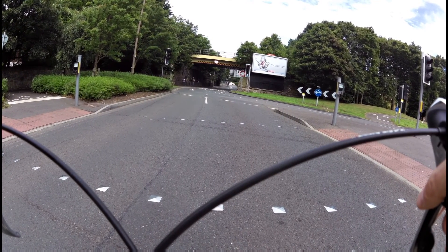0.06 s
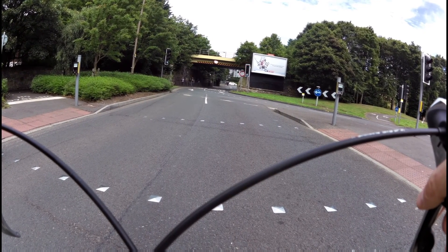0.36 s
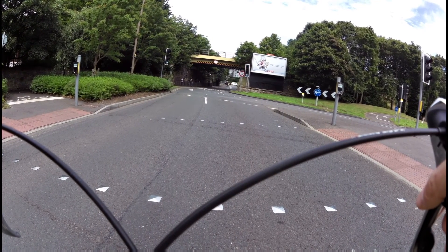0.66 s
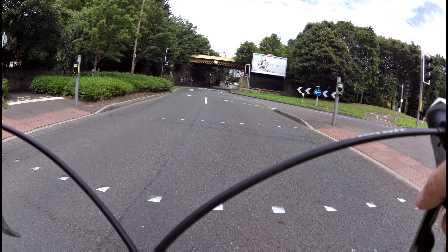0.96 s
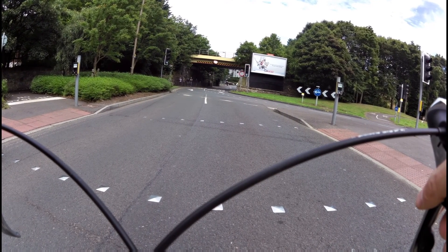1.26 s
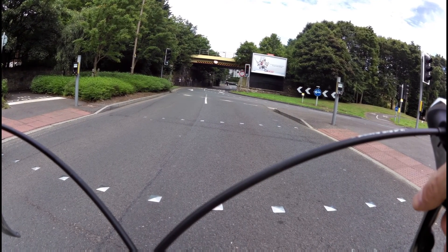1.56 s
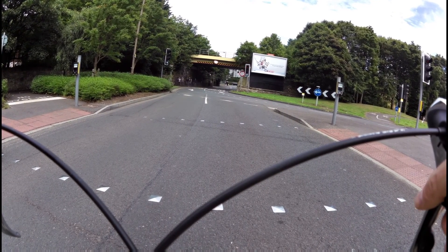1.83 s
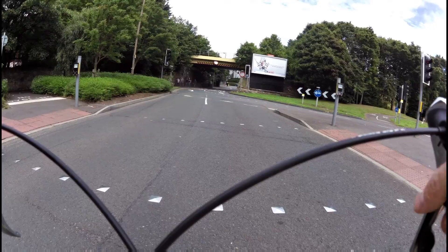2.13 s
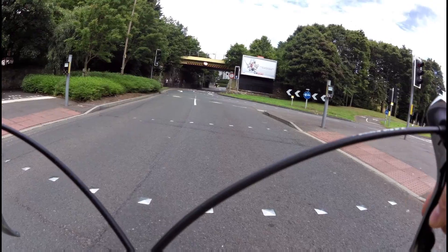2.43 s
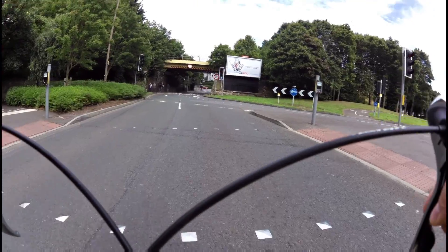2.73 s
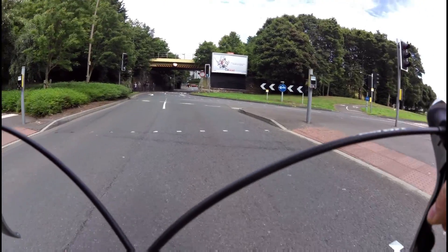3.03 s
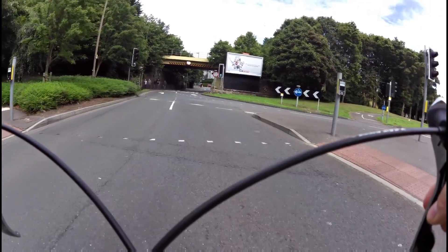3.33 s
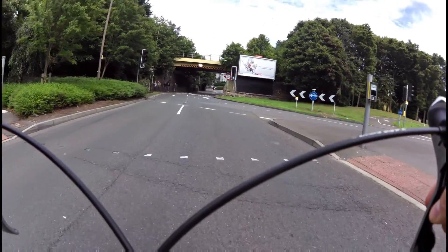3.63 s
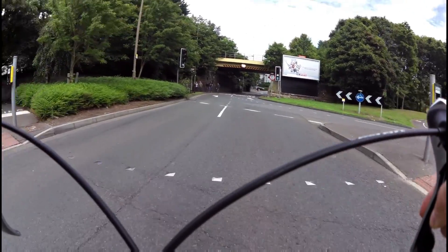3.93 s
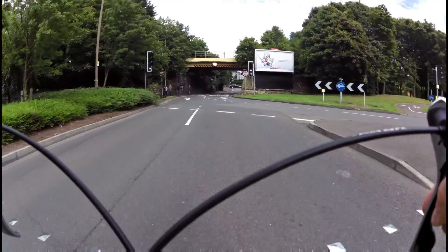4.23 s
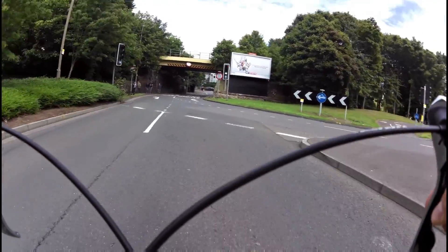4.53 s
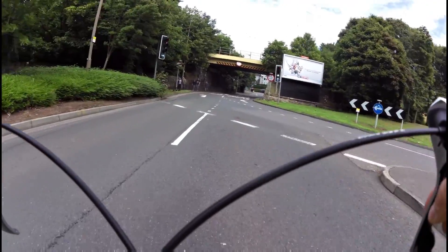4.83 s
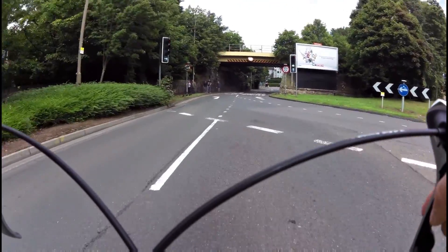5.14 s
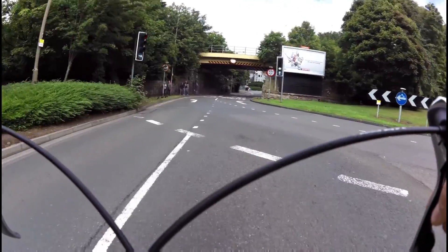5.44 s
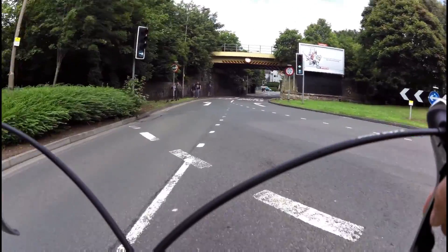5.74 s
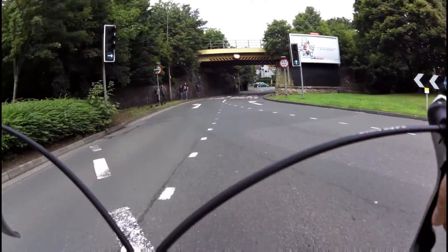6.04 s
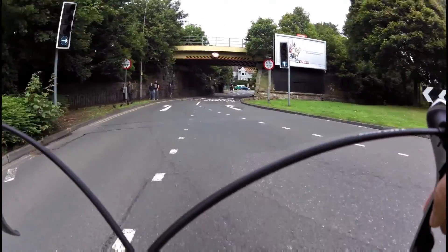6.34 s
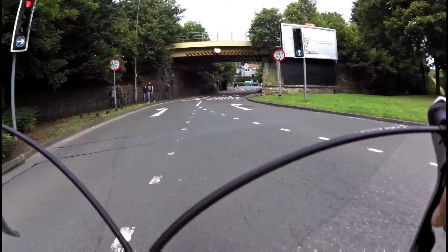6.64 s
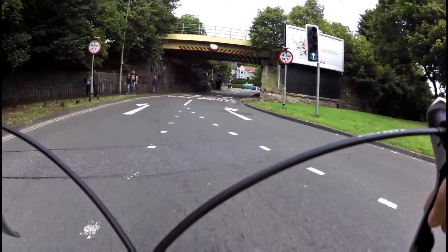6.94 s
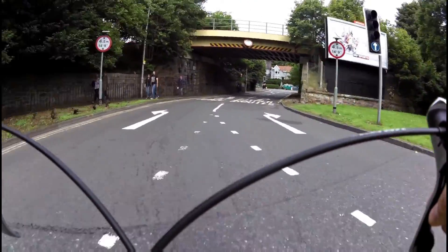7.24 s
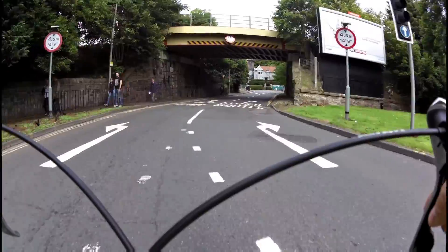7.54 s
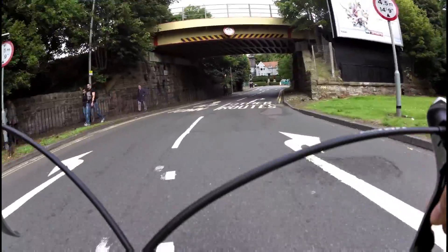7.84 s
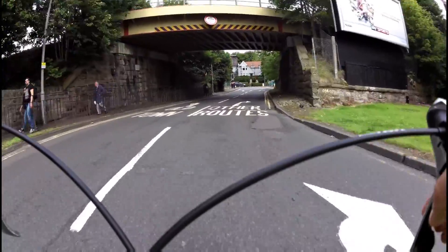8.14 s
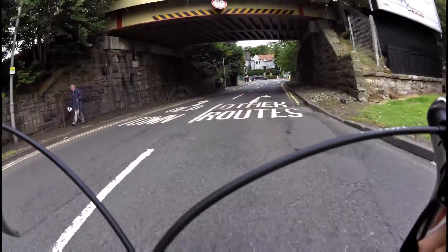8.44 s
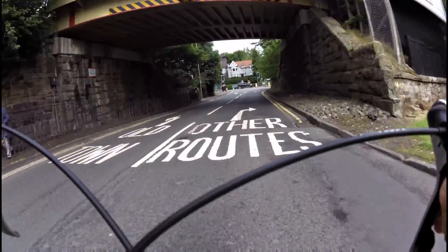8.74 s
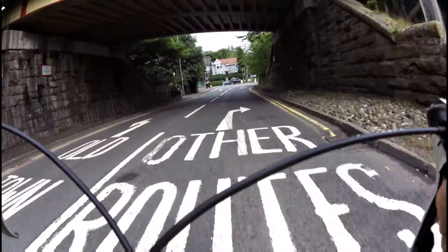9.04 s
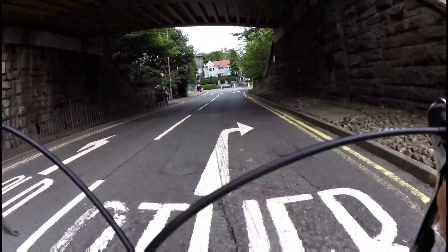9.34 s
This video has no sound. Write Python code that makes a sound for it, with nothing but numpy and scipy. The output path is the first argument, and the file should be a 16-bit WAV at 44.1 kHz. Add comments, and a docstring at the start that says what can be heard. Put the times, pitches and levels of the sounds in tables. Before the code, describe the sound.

A bicycle sets off with a sharp pedal click and hard knocks, then rolls with a rattling drone, ticks and buffeting wind.

```python
"""A bicycle sets off

A bicycle waits in distant traffic. A shoe snaps into its pedal, and knocks ring the frame as it gets going.
Rough asphalt shakes the handlebar and the camera case on it, chain and cables tick, and near a bridge
wind slaps the case. The case muffles the treble, and the hardest blows overload the microphone."""
import sys
import numpy as np
from scipy import signal
from scipy.fft import rfft, irfft, next_fast_len
from scipy.io import wavfile

SR = 44100
rng = np.random.default_rng(int(sys.argv[2]) if len(sys.argv) > 2 else 0)


def store_pcm(level_fs):
    """Save levels as 16-bit WAV."""
    pcm = np.round(np.clip(level_fs, -1, 1) * 32767).astype(np.int16)
    wavfile.write(sys.argv[1], SR, np.atleast_2d(pcm).T)


N = 418509

# tone colour of the far traffic: f/Hz, relative level/dB
TRAFFIC_SPECTRUM = [(15, -64.5), (25, -36.5), (43, -12), (87, -6.5), (228, -5), (291, -2.5), (333, -7),
                    (389, -9.5), (416, -9.5), (509, -14), (666, -14), (1590, -21.5), (2660, -37),
                    (3800, -38.5), (5190, -53), (6750, -74), (11400, -120)]
# a far engine's hum swells and fades: t/s, half-length/s, level/dB
ENGINE_SWELLS = [(1.5, .3, -50.5)]
# knocks on the frame: t/s, strength/dB, contact cut-off f/Hz (lower is softer)
KNOCKS = [(0.501, -29, 300), (2.208, -23, 700), (2.2475, -18.5, 800), (2.2585, -16, 500), (2.308, -21, 600),
          (2.334, -20.5, 3000), (2.6378, -9, 3000), (2.7815, -6.5, 700), (2.791, -10, 920),
          (3.276, -11, 600), (3.3135, 2, 597), (3.3195, 8, 900), (3.3235, 3.5, 1100), (3.3275, 6, 900),
          (3.4935, 8, 1400), (3.499, 3.5, 3000), (3.508, 4.5, 990), (4.297, -9, 1200), (4.330, -2, 1700),
          (4.337, -7, 2530), (4.717, -8.5, 2500), (5.484, -11, 1000), (6.680, -4.5, 710), (6.898, -9, 2000),
          (7.024, -6.5, 1400), (7.311, -9, 2000), (8.433, -2, 4000), (8.577, -3.5, 1500), (8.652, -7, 1200)]
# modes (natural tones) of frame and case: f/Hz, relative level/dB, ring time/s
FRAME_MODES = [(142, -23.5, 0.034), (260, -15.5, .045), (361, -6.5, 0.037), (517, 0.5, 0.025),
               (691, -4, 0.018), (950, -8, 0.0089), (1590, -11.5, .014), (2090, -23, 0.033),
               (2730, -20.5, 0.017), (3720, -22.5, 0.011)]
# metal parts singing: f/Hz, width/Hz, level/dB
METAL_BANDS = [(2540, 260, -68.5), (3130, 220, -70.5), (3705, 240, -69)]
# the shoe slides onto the pedal: t/s, relative level/dB
SCUFF_CURVE = [(2.2, -93), (2.245, -35), (2.26, -23.5), (2.28, -34.5), (2.31, -34), (2.36, -46),
               (2.45, -90)]
CLEAT_CONTACTS = [(2.6339, -4.5), (2.636, -4.5), (2.6384, -4.5)]
# tones of the cleat and of the pedal spring: f/Hz, relative level/dB, ring time/s
CLEAT_MODES = [(397, -26, 0.12), (1120, -16, 0.018), (1440, -8.5, 0.025), (2030, -19, 0.02),
               (2580, -27, 0.021), (3780, 0, 0.0088), (4320, -17, 0.0066), (7300, -45, .02)]
SPRING_MODES = [(3063, -42.5, 0.22), (5335, -55, .1)]
# the bicycle speeds up: t/s, share of cruising speed
SPEED = [(2.25, 0.0056), (2.68, .065), (2.85, .26), (3.2, 0.73), (3.8, 0.78), (4.3, .94), (7.0, 1.0),
         (9.49, 1.044)]
# loudness of the road rattle, dipping briefly near the end: t/s, relative level/dB
RATTLE_LEVEL = [(3.8, -3.5), (4.4, 0.5), (5.95, -2), (6.4, 0), (8.5, 1), (8.8, -2), (9.2, -10.5),
                (9.49, -1.5)]
# the handlebar shudders at the first hard push and a road patch: t/s, half-length/s, relative level/dB
SHUDDERS = [(3.17, 0.053, -20), (6.78, 0.073, -22)]
# where the shaken mount and case drone: f/Hz, width/Hz, relative level/dB
CASE_BANDS = [(132, 146, -13), (269.7, 94, -10.5), (401, 125, -12), (471.3, 74, -10.5), (682, 140, -24.5),
              (828, 255, -27), (1452, 230, -29.5)]
# tones that a tick rings in the case: f/Hz, relative level/dB, ring time/s
TICK_MODES = [(1940, -10, 0.0049), (2390, -1, 0.0059), (3090, -2.5, 0.0056), (3690, -6, .011),
              (4206, -8.5, 0.0065), (4730, -9.5, 0.005), (5560, -19.5, 0.0024), (6560, -23, 0.004)]
# the chain crackles as the first push pulls it tight: t/s, half-length/s, relative level/dB
CHAIN_STRAIN = [(3.14, .06, -44)]
# sharp ticks of gears and cables: t/s, strength/dB, centre f/Hz
TICKS = [(2.7911, -11.5, 3600), (2.9876, -28.5, 3300), (3.1984, -26, 2700), (3.475, -24, 2400),
         (3.5008, -8, 2300), (3.5167, -13, 2920), (4.133, -21.5, 2894), (4.3306, -20, 2800),
         (4.553, -24, 2600), (5.0782, -11, 3930), (5.1706, -19, 3500), (5.5087, -21.5, 2590),
         (5.8726, -9, 4100), (5.8818, -16, 3590), (6.0285, -24.5, 2900), (6.0876, -26.5, 3520),
         (6.1511, -13, 3900), (6.2062, -19, 3060), (6.3076, -17, 3730), (6.342, -19, 3760),
         (6.545, -9.5, 4230), (6.6925, -13, 4320), (7.2435, -22.5, 3505), (7.309, -24, 2700),
         (7.9978, -18.5, 3550), (8.429, -11, 3394), (8.4791, -13.5, 3590), (8.9244, -11, 2620)]
# a squeak of rubbing metal: t/s, half-length/s, level/dB
SQUEAK_SWELLS = [(6.63, 0.045, -70)]
# tone colour of wind on the case: f/Hz, relative level/dB
WIND_SPECTRUM = [(15, -30.5), (35, -2), (52, 10), (100, 5.5), (250, 9), (600, -14), (2000, -78),
                 (8000, -100)]
# gusts: t/s, half-length/s, level/dB
GUSTS = [(6.92, 0.033, -35), (8.63, 0.18, -36.5), (8.96, 0.15, -28), (9.49, 0.072, -34.5)]
# the hardest wind slaps: t/s, strength/dB
BIG_SLAPS = [(6.906, -0.5), (8.484, -3), (8.582, 4.5), (8.589, -0.5), (8.664, -0.5), (8.686, 2),
             (8.796, 2.5), (8.886, 3.5), (8.922, 3), (8.931, 5.5), (8.972, 1.5), (9.005, 1), (9.051, 3),
             (9.085, -2.5), (9.109, -0.5), (9.148, -4)]
# the air's short swing after a slap: f/Hz, relative level/dB, ring time/s
SLAP_MODES = [(131, -3.5, 0.006), (325, 12, 0.0079), (860, -8, 0.007), (1350, -16.5, 0.0031),
              (2800, -29, .003)]
# tone colour of the microphone's hiss: f/Hz, relative level/dB
HISS_SPECTRUM = [(1000, 0.5), (5500, -2.5), (8000, -10), (11000, -16.5), (16000, -24)]


def from_db(db):
    """Turn decibels into a factor to multiply by."""
    return 10 ** (np.asarray(db) / 20)


def rms_one(x):
    """Scale a signal so that its average strength (rms) is 1."""
    return x / np.sqrt(np.mean(x ** 2) + 1e-20)


def curve(rows):
    """Join (time, value) points with straight lines."""
    return np.interp(np.arange(N) / SR, *np.transpose(rows))


def swells(rows):
    """A volume that rises and falls in bell shapes."""
    t = np.arange(N) / SR
    return sum(from_db(db) * np.exp(-((t - s) / half_s) ** 2) for s, half_s, db in rows)


def low_pass(x, hz, order):
    """Keep what lies below hz; a higher order cuts more steeply."""
    return signal.sosfilt(signal.butter(order, min(hz, .45 * SR), fs=SR, output="sos"), x + 1e-18)


def high_pass(x, hz, order):
    """Keep what lies above hz."""
    return signal.sosfilt(signal.butter(order, hz, "high", fs=SR, output="sos"), x + 1e-18)


def drift(rate_hz):
    """A slow random wobble, about 1 in size."""
    return rms_one(low_pass(rng.standard_normal(N + SR), rate_hz, order=2)[SR:])


def coloured_noise(spectrum):
    """Noise with the given tone colour."""
    hz, db = np.transpose(spectrum)
    size = next_fast_len(N)
    bins_hz = np.maximum(np.arange(size // 2 + 1) * SR / size, 1)
    gain = from_db(np.interp(np.log(bins_hz), np.log(hz), db))
    return rms_one(irfft(rfft(rng.standard_normal(size)) * gain, size)[:N])


def shaken(hz, width_hz):
    """A part shaken at random hums in a band around its own pitch."""
    decay = np.exp(-np.pi * width_hz / SR)
    resonator = [1, 0, -1, 1, -2 * decay * np.cos(2 * np.pi * hz / SR), decay * decay]
    return rms_one(signal.sosfilt([resonator, resonator], rng.standard_normal(N)))


def clicks_at(times, sizes):
    """One click at each time."""
    clicks = np.zeros(N)
    samples = np.round(np.asarray(times) * SR).astype(int)
    np.add.at(clicks, np.clip(samples, 0, N - 1), sizes)
    return clicks


def tails(clicks, fade_s):
    """Give each click a smoothly fading tail."""
    return signal.lfilter([1], [1, -np.exp(-1 / (fade_s * SR))], clicks + 1e-18)


def ring(clicks, hz, ring_s):
    """Each click starts a tone that fades by 60 dB in ring_s."""
    decay = np.exp(-np.log(1000) / (ring_s * SR))
    step = 2 * np.pi * hz / SR
    return signal.lfilter([0, np.sin(step)], [1, -2 * decay * np.cos(step), decay * decay], clicks + 1e-18)


def strike(times, db, modes, vary_db, colour_db=0):
    """Blows ring an object's tones; colour_db shifts each tone's level, and vary_db adds chance."""
    shift_db = colour_db + vary_db * rng.standard_normal((len(times), len(modes)))
    sound = np.zeros(N)
    for k, (hz, mode_db, ring_s) in enumerate(modes):
        sizes = from_db(db + mode_db + shift_db[:, k])
        sound += (-1) ** k * ring(clicks_at(times, sizes), hz, ring_s)
    return sound


def softened(modes, contact_hz):
    """Each tone's change in dB under a soft blow, which barely rings the high ones."""
    return -10 * np.log10(1 + (np.array(modes)[:, 0] / np.reshape(contact_hz, (-1, 1))) ** 2)


def along_the_road(speed, per_s, jitter=.45):
    """Uneven moments that come more often the faster the wheels roll."""
    travelled = np.cumsum(speed) / SR
    marks = (np.arange(200) + 1 + jitter * rng.uniform(-1, 1, size=200)) / per_s
    return np.interp(marks[marks < travelled[-1]], travelled, np.arange(N) / SR)


def traffic(level_db=-44):
    """Far cars blend into a wash, with one engine humming in it."""
    wash = from_db(level_db + 0.73 * drift(15.0)) * coloured_noise(TRAFFIC_SPECTRUM)
    return wash + swells(ENGINE_SWELLS) * shaken(hz=101.3, width_hz=7)


def knocks(speed, bump_db=-10.5, bump_contact_hz=650, clatter_db=-13):
    """Pedalling and bumps jolt the frame; loose parts fall back with two weaker, sharper taps."""
    road_bumps = [(s, bump_db, bump_contact_hz) for s in along_the_road(speed, per_s=2.5)]
    times, db, contact_hz = np.transpose(list(KNOCKS) + road_bumps)
    blows = strike(times, db, FRAME_MODES, vary_db=2.56, colour_db=softened(FRAME_MODES, contact_hz))
    sharper_db = softened(FRAME_MODES, 2 * contact_hz)
    for delay_s in rng.uniform(.002, .012, size=(len(times), 2)).T:
        blows += strike(times + delay_s, db + clatter_db, FRAME_MODES, vary_db=3.0, colour_db=sharper_db)
    return low_pass(blows, 6400, order=4)


def metal_ring(start_s=2.06, fade_in_s=.12):
    """Metal parts sing faintly from the moment the bicycle stirs."""
    moving = np.clip((np.arange(N) / SR - start_s) / fade_in_s, 0, 1)
    return moving * sum(from_db(db) * shaken(hz, width) for hz, width, db in METAL_BANDS)


def cleat():
    """The sole scuffs over the pedal, the steel cleat snaps in, and the spring rings on."""
    times, db = np.transpose(CLEAT_CONTACTS)
    snap = strike(times, db, CLEAT_MODES, vary_db=0)
    spring = strike(times[-1:], 0, SPRING_MODES, vary_db=0)
    sole = shaken(hz=460, width_hz=78) + shaken(hz=220, width_hz=270)
    scrape = low_pass(shaken(hz=3000, width_hz=1800), 4200, order=8)
    scuff = low_pass(sole, 1500, order=2) + from_db(-28.5) * scrape
    return low_pass(snap, 6500, order=3) + spring + from_db(curve(SCUFF_CURVE) - 1.5) * scuff


def pedalling(first_push_s=3.144, push_every_s=.605, effort_db=14, ease_s=1.72, swing_db=1):
    """Force on the pedals in dB: it swings with each push and eases once under way."""
    since_s = np.arange(N) / SR - first_push_s
    setting_off = effort_db * np.exp(-np.maximum(since_s, 0) / ease_s)
    return setting_off + swing_db * np.cos(2 * np.pi * since_s / push_every_s)


def road_shake(bar_db, drone_db, bumps):
    """The road makes the handlebar flex with a low hum, while mount and case drone above it."""
    bar = (from_db(bar_db) + swells(SHUDDERS)) * shaken(hz=90.1, width_hz=30)
    case = rms_one(sum(from_db(db) * shaken(hz, width) for hz, width, db in CASE_BANDS))
    return bar + from_db(drone_db + 2.0 * bumps) * low_pass(case, 1900, order=6)


def tyre_grit(level_db, bumps, grains_per_s=900, spread_db=8.5):
    """Grit under the tyres makes tiny ticks in a faint rub, stronger on each bump."""
    times = np.flatnonzero(rng.random(N) < grains_per_s / SR) / SR
    sizes_db = spread_db * np.minimum(rng.exponential(1, len(times)), 3.5)
    grains = strike(times, sizes_db, TICK_MODES, vary_db=4.5, colour_db=softened(TICK_MODES, 1490))
    rub = from_db(-4) * shaken(hz=2610, width_hz=590)
    return from_db(level_db + 3.3 * bumps) * low_pass(rms_one(grains) + rub, 4600, order=8)


def chain(speed, bumps, links_per_s=85, spread_db=6.0, cruise_db=-58):
    """Link after link meets the cog, some barely touching and some with a clear tick."""
    links = np.arange(round(links_per_s * N / SR))
    late, size = np.clip(rng.standard_normal((len(links), 2)), -2, 2).T
    times = (links + 0.27 * late) / links_per_s
    clinks = strike(times, spread_db * size, TICK_MODES, vary_db=6.0)
    gain = from_db(cruise_db) * speed ** 2 + swells(CHAIN_STRAIN)
    return gain * from_db(2.0 * bumps) * rms_one(low_pass(clinks, 6200, order=5))


def cable_taps(speed, tap_db=-26, spread_db=3, centre_hz=2750, spread_octaves=0.26):
    """Cables tap the frame, more often at speed and louder with the rattle; gives rows like TICKS."""
    times = along_the_road(speed ** 3, per_s=5.5, jitter=.9)
    size, pitch = np.clip(rng.standard_normal((len(times), 2)), -2, 2).T
    db = tap_db + spread_db * size + np.interp(times, *np.transpose(RATTLE_LEVEL))
    return np.column_stack([times, db, centre_hz * 2 ** (spread_octaves * pitch)])


def ticks(speed, focus_db=10, bounce_db=-6, spray_db=-26):
    """Gears and cables ring the case and bounce once; hard hits add a thin crack and a spray of noise."""
    times, db, centre_hz = np.vstack([TICKS, cable_taps(speed)]).T
    octaves_off = np.log2(np.array(TICK_MODES)[:, 0] / centre_hz[:, None]) - .25
    colour_db = -focus_db * octaves_off ** 2   # tones near the tick's centre ring most
    bounce_times = times + rng.uniform(.0008, 0.0027, len(times))
    rings = strike(times, db - 1, TICK_MODES, vary_db=2.5, colour_db=colour_db)
    rings += strike(bounce_times, db + bounce_db, TICK_MODES, vary_db=2.5, colour_db=colour_db)
    cracks = clicks_at(times, from_db(1.7 * db - 11))
    spray = from_db(spray_db) * tails(cracks, fade_s=.004) * rng.standard_normal(N)
    treble = high_pass(cracks + spray, 4000, order=2)
    return low_pass(rings, 6700, order=6) + low_pass(treble, 7000, order=1)


def squeak(hz=5330):
    """Rubbing metal gives a faint, slightly unsteady tone."""
    phase = 2 * np.pi * np.cumsum(hz + 12 * drift(40)) / SR
    return swells(SQUEAK_SWELLS) * np.sqrt(2) * np.sin(phase)


def flurry(start_s=8.87, end_s=9.06, per_s=72, strongest_db=-2):
    """Quick slaps of air at the height of the strongest gust; gives rows like BIG_SLAPS."""
    times = np.arange(start_s, end_s, 1 / per_s)
    late, weaker = rng.random((len(times), 2)).T
    return np.column_stack([times + late / per_s, strongest_db - 4 * weaker])


def wind(headwind_db, flutter_per_s=190):
    """Air rumbles over the case; slaps push or pull on the microphone, each with a swirling crunch."""
    flow = np.hypot(from_db(headwind_db), swells(GUSTS))
    rumble = flow * from_db(2.2 * drift(6.3)) * coloured_noise(WIND_SPECTRUM)
    times, db = np.vstack([BIG_SLAPS, flurry()]).T
    slaps = clicks_at(times, rng.choice([-1, 1], len(times)) * from_db(db - 6.5))
    # small slaps flutter between the big ones and grow with the flow
    slaps += (rng.random(N) < flutter_per_s / SR) * rng.uniform(-0.98, 1, N) * flow * from_db(17.0)
    swing = sum(from_db(mode_db) * ring(slaps, hz, ring_s) for hz, mode_db, ring_s in SLAP_MODES)
    swirls = tails(np.abs(slaps), fade_s=0.002)
    crunch = from_db(-13) * swirls * rms_one(low_pass(rng.standard_normal(N), 870, order=1))
    return rumble + high_pass(low_pass(swing + crunch, 3400, order=4), 110, order=2)


def scene(bar_db=-30.5, drone_db=-19.5, grit_db=-52.5, wind_db=-44):
    """Traffic all along; shaking, rattle and wind grow with speed, and pedalling strains the handlebar."""
    speed = curve(SPEED)
    tenfolds = np.log10(speed)   # 0 at cruising speed, -1 at a tenth of it
    rattle_db = curve(RATTLE_LEVEL)
    bumps = drift(18.2)   # the uneven road, shared by case, grit and chain
    shaking = speed * road_shake(bar_db + pedalling(), drone_db + 0.29 * rattle_db, bumps)
    rattling = from_db(rattle_db) * (tyre_grit(grit_db + 21.5 * tenfolds, bumps) + chain(speed, bumps))
    bicycle = shaking + rattling + metal_ring() + knocks(speed) + cleat() + ticks(speed) + squeak()
    return (traffic() + bicycle + wind(wind_db + 16 * tenfolds))[None]


def record(dry, hiss_db=-77, overload=0.67, top_hz=15800):
    """The microphone drops the deepest bass, adds hiss, flattens loud peaks and cuts the top treble."""
    heard = high_pass(dry, 32, order=5) + from_db(hiss_db) * coloured_noise(HISS_SPECTRUM)
    flattened = heard / (1 + (heard / overload) ** 10) ** (1 / 10)
    fade_out = np.minimum(np.arange(N)[::-1] / (.004 * SR), 1)
    treble_cut = signal.ellip(10, .1, 80, top_hz, fs=SR, output="sos")
    return signal.sosfilt(treble_cut, flattened * fade_out)


dry = scene()
out = record(dry)
store_pcm(out)
```